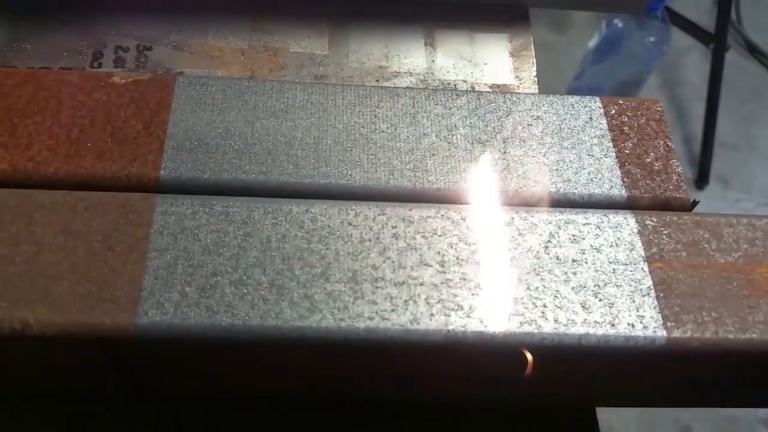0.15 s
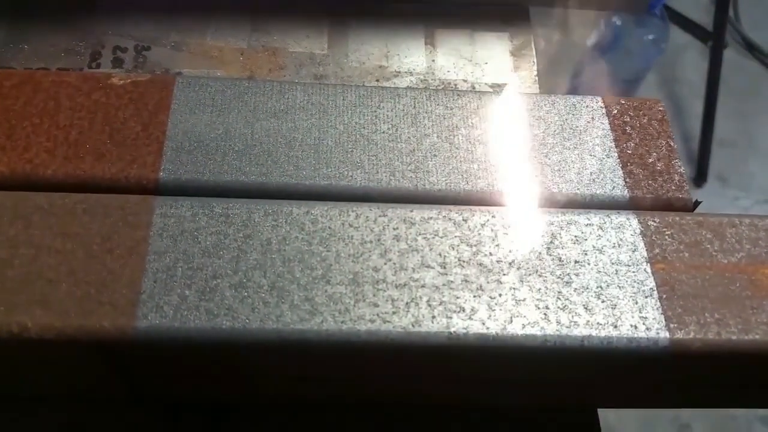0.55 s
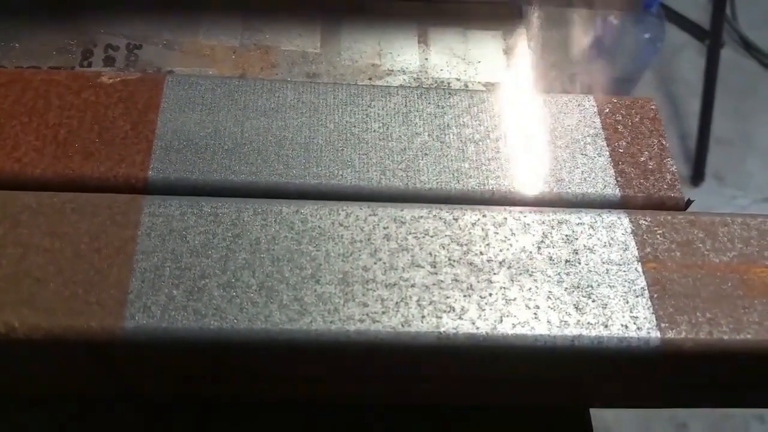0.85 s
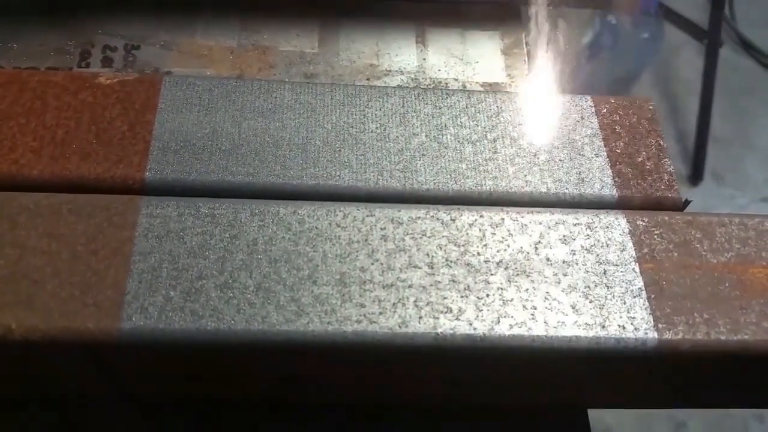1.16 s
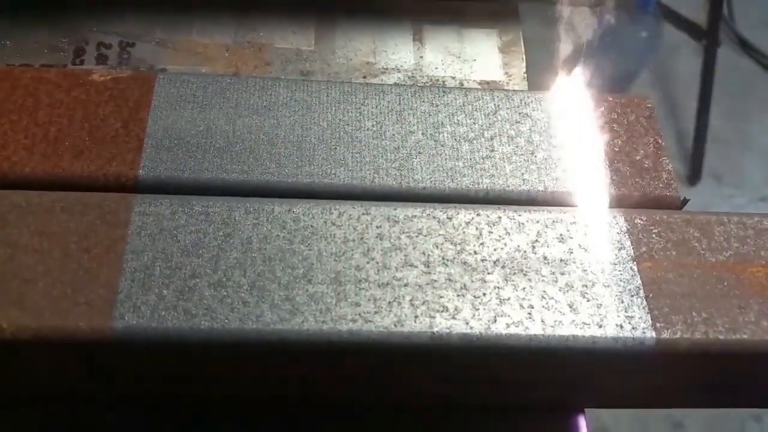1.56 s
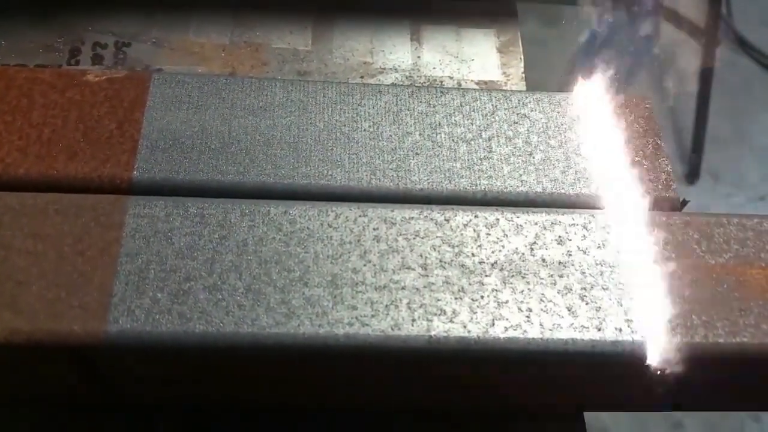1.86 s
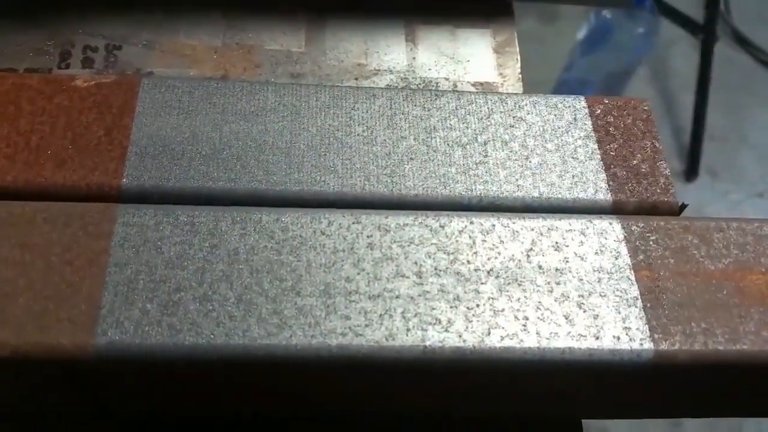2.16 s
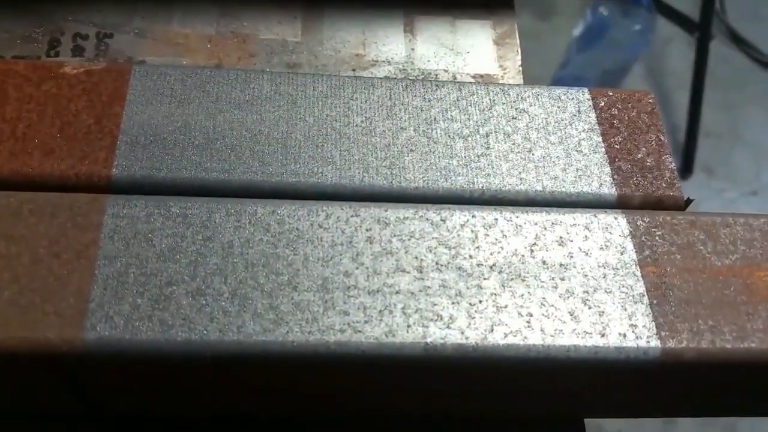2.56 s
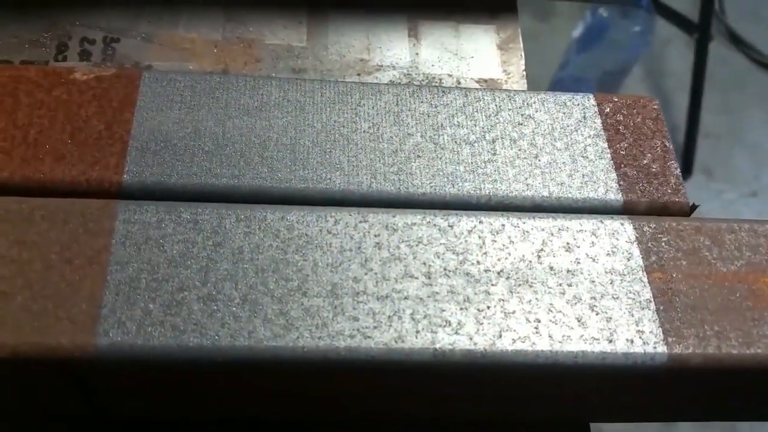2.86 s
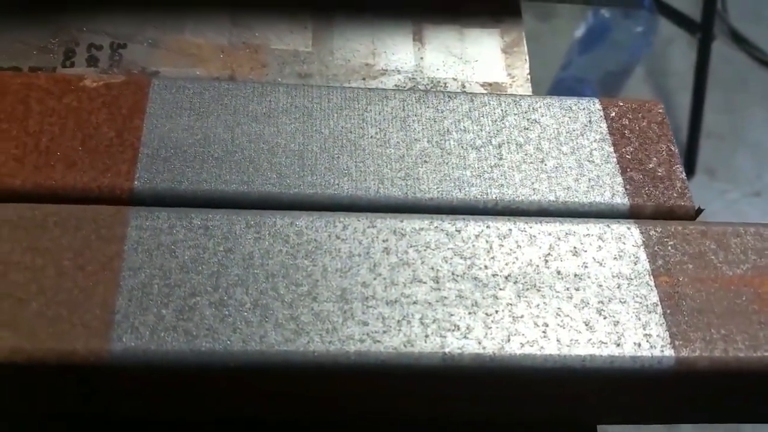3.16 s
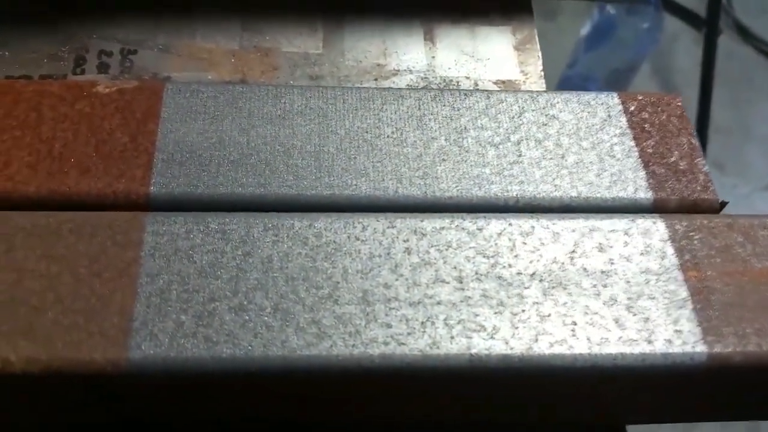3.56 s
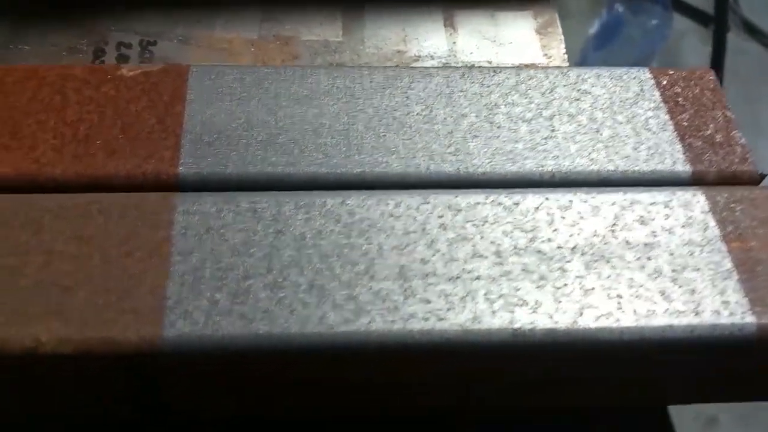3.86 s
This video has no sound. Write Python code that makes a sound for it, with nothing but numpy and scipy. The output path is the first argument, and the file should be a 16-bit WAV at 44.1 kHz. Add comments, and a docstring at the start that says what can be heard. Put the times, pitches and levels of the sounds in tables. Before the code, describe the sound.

From the start until about 1.9 seconds, a pulsed laser on rusty steel fires loud, piercing bursts, roughly twenty a second in uneven pairs, alternating slightly in pitch around a shrill whine. Each carries distorted rumble, hiss and crackling clicks. It stops abruptly with a brief hall tail. Quiet fan noise and faint machine hum remain, swelling clearly from about 3.1 to 3.6 seconds, then holding steady to about 4 seconds.

```python
"""A pulsed laser sweeps to and fro over rusty steel bars in a workshop, then is switched off.
Each sweep is a burst of plasma pops, a harmonic pulse train near 5 kHz pitched down and up in turn;
with it come lumpy rumble, hiss and clicks of the overloaded microphone, and the pops ring in a hall.
Fans (noise through duct resonances) and a machine (wavering sines) run behind;
the level at which they are heard rises after the laser stops."""
import sys
import numpy as np
from scipy import signal
from scipy.fft import rfft, irfft
from scipy.io import wavfile
from scipy.ndimage import uniform_filter1d

SR = 44100
rng = np.random.default_rng(int(sys.argv[2]) if len(sys.argv) > 2 else 0)


def persist_wave(psi):
    """Save psi, clipped to +-1, as 16-bit WAV."""
    counts = np.round(np.clip(psi, -1, 1) * 32767).astype(np.int16)
    wavfile.write(sys.argv[1], SR, np.atleast_2d(counts).T)


N = 176400

PULSE_HZ, DOPPLER_HZ, BEND_HZ = 4960, 22, 1.5   # bend: fall over one sweep
TURN_HZ, TURN_S, STRAY_HZ = 55, .002, 4   # extra shift at one end of the stripe; rms random stray
ATTACK_S, RELEASE_S = .001, .003
ROUGH_HZ, ROUGH_TOP_HZ, FADE_DB = 200, 900, 1.2   # two low-pass corners; rms fading
CLICKS_PER_S, CLICK_SHARE = 700, .8   # share: rms against the steady noise
LUMP_HZ, LUMP_DB = 131, 4
HALL_DB, HALL_T60_S = -19.5, 1.0
EARLY_GAIN, EARLY_T60_S = 2.5, .05
PATCHY_HZ, PATCHY_DB = 7.64, 0.64
HUM_RIGHT_DB = -6.5
CEILING, CUTOFF_HZ = .9, 15780


def from_db(db):
    """Amplitude factor of a level in dB."""
    return 10 ** (np.asarray(db) / 20)


def rms_one(x):
    """Scale the whole array to an rms of 1."""
    return x / np.sqrt(np.mean(x ** 2) + 1e-20)


def in_time(rows):
    """Columns of a table, interpolated over its first column in seconds."""
    s, *columns = np.transpose(rows)
    return [np.interp(np.arange(N) / SR, s, c) for c in columns]


def at_hz(points, hz):
    """Curve through (Hz, value) points, linear in log frequency."""
    point_hz, value = np.array(points).T
    return np.interp(np.log(hz), np.log(point_hz), value)


def bins_hz():
    """Frequencies of the spectrum's bins, at least 1 Hz."""
    return np.maximum(np.arange(N // 2 + 1) * SR / N, 1)


def wander(hz, count):
    """Rows of noise through a one-pole low-pass; rms 1."""
    r = np.exp(-2 * np.pi * hz / SR)
    return rms_one(signal.lfilter([1], [1, -r], rng.standard_normal((count, N))))


def sweeps():
    """Beam motion per sample: gate, pitch shift in Hz, place on the stripe (0 to 1), levels in dB."""
    # Each row: start in seconds, length in seconds, tone level in dB, rumble level in dB.
    sweep_rows = [(0, 0.044, -16, -17), (0.0617, 0.036, -13, -17.5), (0.1032, 0.041, -16, -18.5),
                  (0.158, 0.038, -13, -16), (0.1996, 0.034, -14.5, -17.5), (0.2545, 0.037, -13.5, -19.5),
                  (0.2959, 0.038, -14, -18), (0.3508, 0.037, -13.5, -17.5), (0.392, 0.037, -13.5, -16.5),
                  (0.4474, 0.039, -13, -17), (0.4884, 0.037, -12.5, -19), (0.5436, 0.037, -13.5, -17),
                  (0.5847, 0.037, -13.5, -17), (0.6398, 0.037, -13.5, -18), (0.681, 0.037, -14, -15.5),
                  (0.7364, 0.037, -13.5, -18.5), (0.7777, 0.036, -14.5, -18.5), (0.8326, 0.037, -15, -17),
                  (0.8742, 0.037, -15.5, -17.5), (0.929, 0.039, -15.5, -19), (0.9704, 0.041, -14.5, -18.5),
                  (1.0255, 0.037, -16, -16.5), (1.0666, 0.037, -15.5, -17.5), (1.1219, 0.037, -15, -17.5),
                  (1.1629, 0.036, -15.5, -16.5), (1.2181, 0.035, -17.0, -16), (1.2592, 0.035, -14, -17.5),
                  (1.3145, 0.034, -17.0, -18), (1.3555, 0.034, -15, -19), (1.4113, 0.036, -16.0, -17.5),
                  (1.4518, 0.032, -15.5, -16), (1.5072, 0.035, -16, -17.5), (1.5481, 0.038, -15.5, -18.0),
                  (1.6039, 0.035, -15.5, -18), (1.6448, 0.035, -16, -17), (1.7002, 0.038, -14, -16.5),
                  (1.7412, 0.032, -15, -18), (1.7963, 0.037, -15.5, -18), (1.8373, 0.035, -15, -16.5),
                  (1.8928, 0.032, -13.5, -20)]
    t = np.arange(N) / SR
    gate, shift_hz, place, tone_db, rumble_db = np.zeros((5, N))
    for k, (start_s, length_s, tone, rumble) in enumerate(sweep_rows):
        first = max(int((start_s - .002) * SR), 0)
        i = slice(first, int((start_s + length_s + .003) * SR))
        since_s, left_s = t[i] - start_s, start_s + length_s - t[i]
        gate[i] = np.clip(np.minimum(since_s / ATTACK_S, left_s / RELEASE_S) + .5, 0, 1)
        # starts high on leaving place 0, sags on arriving back there
        if k % 2:
            direction, turn_hz = 1, TURN_HZ * np.exp(-since_s / TURN_S)
            place[i] = since_s / length_s
        else:
            direction, turn_hz = -1, -TURN_HZ * np.exp(-left_s / TURN_S)
            place[i] = left_s / length_s
        bend_hz = BEND_HZ * (since_s / length_s - .5)
        shift_hz[i] = DOPPLER_HZ * direction - bend_hz + turn_hz
        tone_db[i], rumble_db[i] = tone, rumble
    stray_hz = STRAY_HZ * rms_one(uniform_filter1d(wander(30, count=1)[0], size=300))
    return gate, shift_hz + stray_hz, place, tone_db, rumble_db


def flutter():
    """Complex noise for two ears through two one-pole low-passes, so it falls off steeply; rms 1."""
    r = np.exp(-2 * np.pi * ROUGH_TOP_HZ / SR)
    re, im = (rms_one(signal.lfilter([1], [1, -r], wander(ROUGH_HZ, count=2))) for _ in range(2))
    return (re + 1j * im) * np.sqrt(.5)


def pops(gate, shift_hz, place, tone_db):
    """Pulse train as three harmonics, each roughened in height and timing on its way to each ear."""
    # Harmonics against the tone as the stripe creeps along. Each row: time in seconds, then
    # 1st left, 2nd left, 2nd right, 3rd left, 3rd right in dB (1st right is 0 dB).
    overtones = [(0, -5.5, -6, -8, -6, -10), (.5, -6, -7, -8, -8, -12), (1, -4, -5, -8, -10, -12),
                 (1.4, -4, -6, -10, -9, -8), (1.95, -3, -5, -11, -8.5, -9.5)]
    # Unevenness of the pops. Each row, for harmonics 1 to 3: left share, right share.
    rough_shares = [(.38, .2), (.62, .45), (.65, .55)]
    # Phase by which the left ear trails. Each row, for harmonics 1 to 3: at place 0, at place 1 in radians.
    left_trail = [(1.2, 3.3), (0.0, 3.2), (.5, 5.0)]
    # Faint side tones. Each row: frequency in Hz, multiple of the pitch shift, left in dB, right in dB.
    side_tones = [(3130, -1, -22, -36), (6000, 1, -34, -32), (10980, 3, -26, -24), (12000, 1, -31, -32),
                  (13120, -1, -24, -36), (15700, 1, -22, -28)]
    t = np.arange(N) / SR
    slip = np.cumsum(shift_hz) / SR   # cycles
    out = np.zeros((2, N))
    first, *upper = in_time(overtones)
    levels = [(first, 0 * first), upper[:2], upper[2:]]
    for k, (db, rough, (trail_0, trail_1)) in enumerate(zip(levels, rough_shares, left_trail)):
        share = np.clip(rough, 0, 1)[:, None]
        uneven = np.sqrt(1 - share ** 2) + share * flutter()
        db = db + FADE_DB * rms_one(uniform_filter1d(wander(25, count=2), size=200))
        trail = (trail_0 + (trail_1 - trail_0) * place) * [[1], [0]]
        phase = 2 * np.pi * (k + 1) * (PULSE_HZ * t + slip) - trail
        out += from_db(db) * np.real(uneven * np.exp(1j * phase))
    for hz, follows, *db in side_tones:
        tone = np.cos(2 * np.pi * (hz * t + follows * slip))
        out += from_db(db)[:, None] * wander(27, count=2) * tone
    return np.sqrt(2) * gate * from_db(tone_db) * out


def hall(x):
    """Diffuse tail: a dying noise for each ear, with strong first echoes."""
    t = np.arange(SR) / SR
    decay = from_db(-60 * t / HALL_T60_S) + EARLY_GAIN * from_db(-60 * t / EARLY_T60_S)
    tail = rng.standard_normal((2, SR)) * decay * (t > .003)
    tail = signal.lfilter([1], [1, -.8], tail)   # walls dull it
    tail = rms_one(tail) / np.sqrt(SR)   # unit energy
    return from_db(HALL_DB) * signal.fftconvolve(x, tail, axes=1)[:, :N]


def overload_noise(gate, rumble_db):
    """Overloaded microphone in each sweep: lumpy coloured noise and clicks, unrelated in the two ears."""
    # Spectrum of rumble and hiss. Each row: frequency in Hz, relative density in dB.
    overload_colour = [(25, -39), (60, -1.5), (120, 0.5), (300, 5.5), (700, 1.5), (1500, -6), (3000, -14),
                       (4600, -10.5), (5500, -26), (6700, -26.5), (8200, -20), (9400, -18), (11000, -14),
                       (12400, -20), (14000, -10), (15600, -27.5)]
    # Lift of the right ear. Each row: frequency in Hz, lift in dB.
    right_lift = [(60, 2), (300, -3), (1500, -4.5), (5000, -2), (9000, -6), (15000, 0)]
    hz = bins_hz()
    colour_db = at_hz(overload_colour, hz) + at_hz(right_lift, hz) * [[0], [1]]
    clicks = rng.standard_normal((2, N)) * (rng.random((2, N)) < CLICKS_PER_S / SR)
    grit = rng.standard_normal((2, N)) + CLICK_SHARE * rms_one(clicks)
    noise = irfft(rfft(grit) * from_db(colour_db), N)
    lumps = from_db(LUMP_DB * rms_one(uniform_filter1d(wander(LUMP_HZ, count=2), size=40)))
    out = gate * from_db(rumble_db) * rms_one(noise * lumps)
    return signal.sosfilt(signal.butter(2, 40, "high", fs=SR, output="sos"), out)


def workshop():
    """Fan noise through duct resonances and a few wavering machine tones, under one level curve."""
    # Each row: time in seconds, level in dB, lift of the 6.5-9.5 kHz hiss in dB.
    workshop_level = [(0, -33.5, 6), (1, -34, 1), (1.9, -32, 0), (2.05, -31.5, -0.5), (2.45, -31, -1),
                      (2.7, -28.5, -0.5), (3.1, -28.5, 0), (3.25, -22.5, 0), (3.4, -19, -1),
                      (3.55, -17.5, 0), (3.75, -17, 0.5), (4, -17.5, 2)]
    # Fan spectrum. Each row: frequency in Hz, relative density in dB.
    fan_colour = [(15, -67), (25, -47), (64, -33), (92, -28), (326, -10.5), (363, -5.5), (677, -11.5),
                  (1370, -5.5), (2050, -11), (2280, -11), (6560, -19), (7920, -20), (16000, -35.5)]
    # Peaks and dips of housings and ducts. Each row: frequency in Hz, width in Hz, lift in dB.
    ducts = [(490, 90, 6), (735, 45, 6), (1335, 80, 7), (1410, 40, 4), (1530, 50, 5), (1780, 55, 7),
             (2060, 120, -7), (2315, 70, 6), (2465, 35, 6), (2756, 40, 6), (3050, 200, -4), (3293, 40, 8),
             (4250, 500, 4), (5700, 250, -4), (7140, 200, 3), (7870, 400, 6), (9800, 500, -5)]
    # Each row: frequency in Hz, left-right correlation.
    likeness = [(60, 1), (110, 1), (200, 0.99), (380, -0.36), (700, 0.39), (1290, -0.82), (2380, -0.28),
                (4400, 0.026), (8120, -0.32), (15000, 0.051)]
    # Each row: frequency in Hz, left minus right in dB.
    fan_pan = [(60, -16), (99, -2), (160, -13.5), (270, 0), (450, 1), (740, -4.0), (1220, -6), (2010, -6.5),
               (3330, -6), (5500, -1), (9080, -7), (15000, -1)]
    # Machine tones. Each row: frequency in Hz, level against the noise in dB, waver in dB,
    # beats per second, time of a peak of the waver in seconds.
    hum_tones = [(100, -29, 6.0, 2.7, 2.25), (197, -27, 3.0, .7, 2.3), (363, -16.5, 1.0, 1.1, 2.5)]
    hz, t = bins_hz(), np.arange(N) / SR
    side = np.array([[1], [-1]])
    colour_db = at_hz(fan_colour, hz)
    for peak_hz, width_hz, lift_db in ducts:
        colour_db = colour_db + lift_db / (1 + ((hz - peak_hz) / width_hz * 2) ** 2)
    colour_db = colour_db + side * at_hz(fan_pan, hz) / 2
    alike = np.clip(at_hz(likeness, hz), -1, 1)
    mid, apart = rfft(rng.standard_normal((2, N)))
    spectrum = (np.sqrt(1 + alike) * mid + np.sqrt(1 - alike) * apart * side) * from_db(colour_db)
    level_db, treble_db = in_time(workshop_level)
    hiss = irfft(spectrum * (hz > 6500) * (hz < 9500), N)
    noise = rms_one(irfft(spectrum, N) + (from_db(treble_db) - 1) * hiss)
    patches = rms_one(uniform_filter1d(wander(PATCHY_HZ, count=1), size=800))
    noise = noise * from_db(PATCHY_DB * patches)
    hum = np.zeros(N)
    for tone_hz, db, waver_db, beat_hz, peak_s in hum_tones:
        tone_db = db + waver_db * np.cos(2 * np.pi * beat_hz * (t - peak_s))
        hum += from_db(tone_db) * np.sqrt(2) * np.sin(2 * np.pi * tone_hz * t)
    return from_db(level_db) * (noise + hum * from_db([[0], [HUM_RIGHT_DB]]))


def scene():
    """Sum of pops, their hall, overload noise and workshop; the sweeps drive pops and overload."""
    gate, shift_hz, place, tone_db, rumble_db = sweeps()
    laser = pops(gate, shift_hz, place, tone_db)
    return laser + hall(laser) + overload_noise(gate, rumble_db) + workshop()


def record(dry):
    """Peaks are rounded by tanh, the top is cut by a steep elliptic low-pass."""
    rounded = CEILING * np.tanh(dry / CEILING)
    return signal.sosfilt(signal.ellip(12, .3, 80, CUTOFF_HZ, fs=SR, output="sos"), rounded)


dry = scene()
out = record(dry)
persist_wave(out)
```